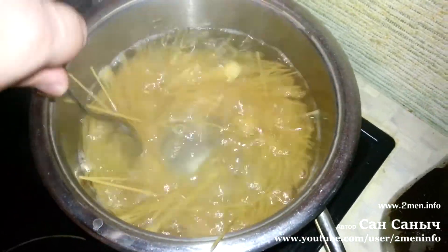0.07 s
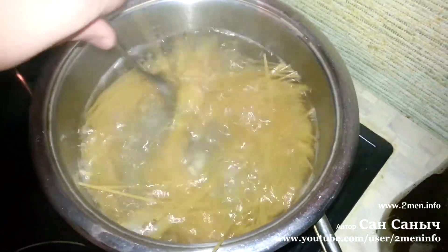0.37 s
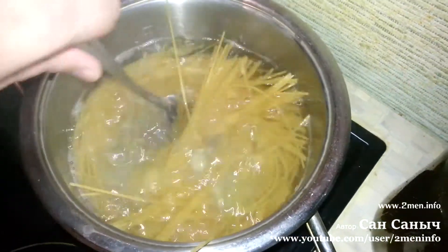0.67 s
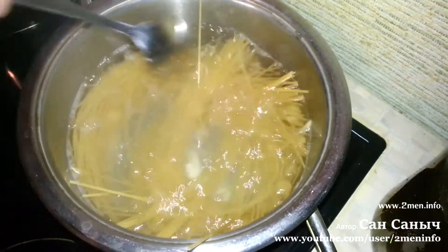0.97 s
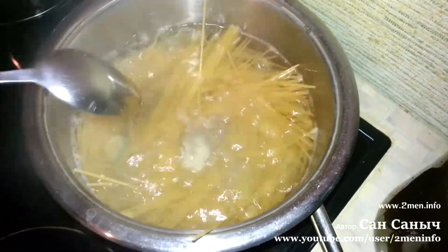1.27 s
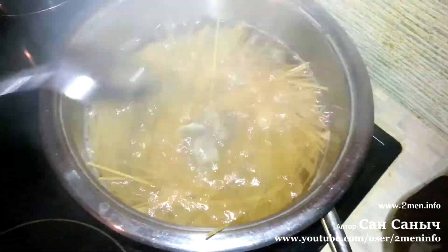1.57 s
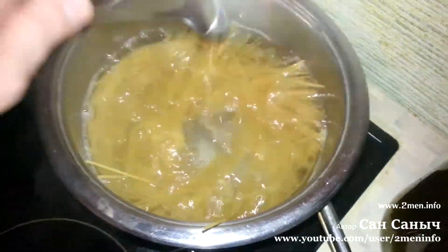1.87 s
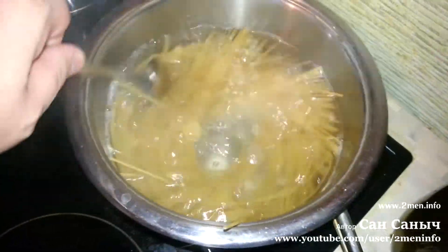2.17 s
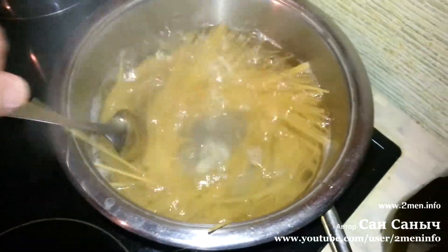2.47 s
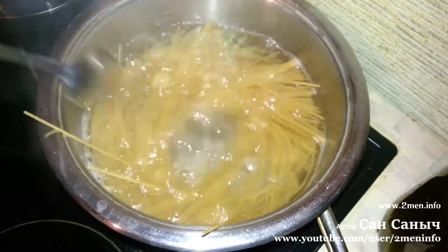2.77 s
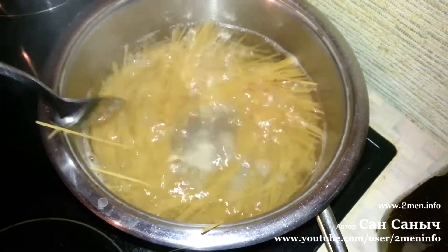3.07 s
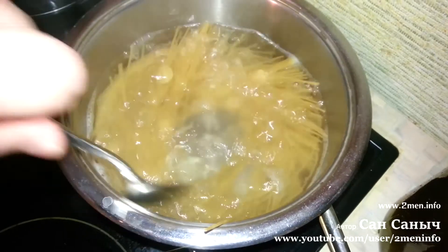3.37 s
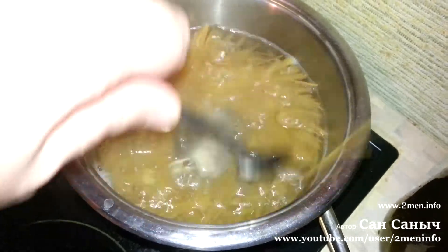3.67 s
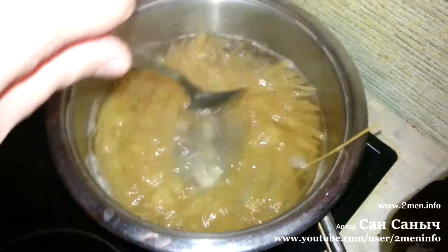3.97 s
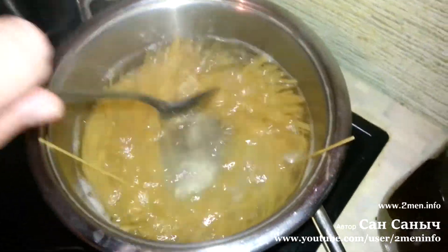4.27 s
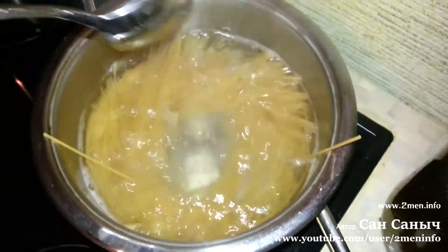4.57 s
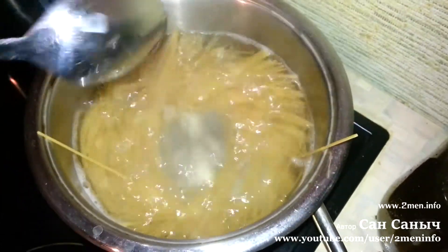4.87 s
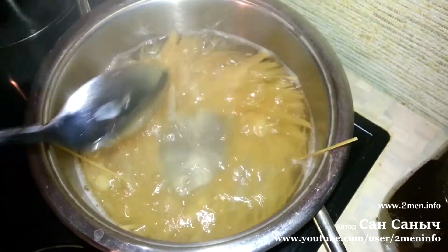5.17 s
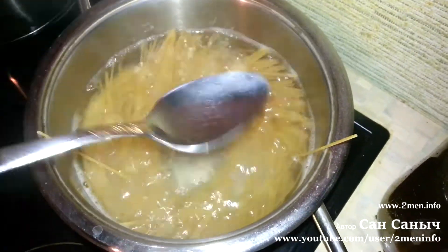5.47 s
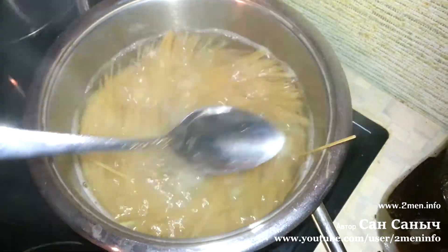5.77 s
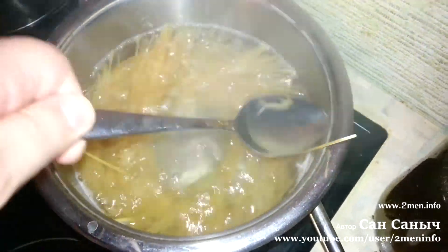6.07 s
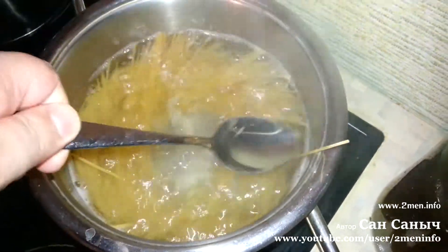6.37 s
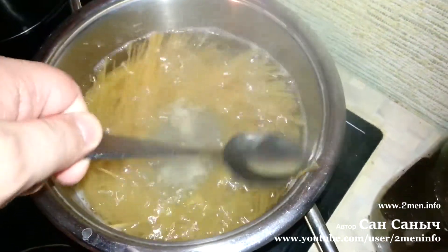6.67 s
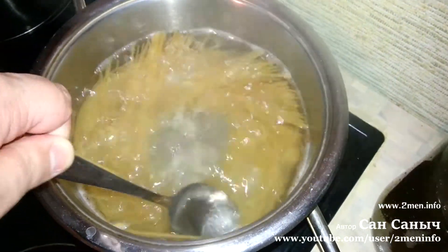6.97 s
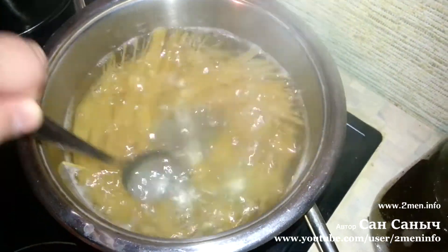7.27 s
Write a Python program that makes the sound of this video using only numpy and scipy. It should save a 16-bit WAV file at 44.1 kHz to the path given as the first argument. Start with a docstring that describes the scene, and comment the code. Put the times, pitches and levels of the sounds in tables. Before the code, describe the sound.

Water bubbles and plops in a steel pot while a metal spoon clinks and briefly scrapes against its side.

```python
"""A small kitchen, close to a steel pot of boiling spaghetti.
Steam bubbles plop and spit, resonating in the hollow of the pot over a low simmer and a fine fizz.
A metal spoon stirs: its knocks ring the wall and the spoon, its scrapes drive resonances by stick-slip.
Two soft bumps sound as the spoon is lowered. Hob, tiles and walls add a short reverberation."""
import sys
import numpy as np
from scipy import signal
from scipy.fft import rfft, irfft
from scipy.io import wavfile
from scipy.ndimage import uniform_filter1d

SR = 44100
rng = np.random.default_rng(int(sys.argv[2]) if len(sys.argv) > 2 else 0)


def inscribe(sig):
    """Save sig as 16-bit PCM at rate SR to the path in sys.argv[1].

    A 1-D sig is mono; a 2-D sig holds one channel per row.
    Samples are clipped to [-1, 1] before scaling.
    """
    pcm = np.round(np.clip(np.atleast_2d(sig).T, -1, 1) * 32767)
    wavfile.write(sys.argv[1], SR, pcm.astype(np.int16))


N = 322371
TIME_S = np.arange(N) / SR
RING_S = np.arange(SR // 2) / SR


# Strength of the boil: time_s, level_db
BOIL_STRENGTH = [(0, -40), (.41, -41), (.83, -45.5), (1.5, -41.5), (2.1, -43.5), (2.9, -43.5),
                 (3.44, -41.5), (3.75, -46), (4.5, -44), (6.7, -45), (7.31, -43)]
# Air modes of the pot: pitch_hz, width_hz, gain_db
POT_AIR_MODES = [(216, 100, -23), (290, 30, -39), (417, 22, -11), (503, 39, -35.5), (728, 17.3, 7),
                 (910, 46, 1.5), (1313, 65, -1)]
# Simmer spectrum: freq_hz, density_db
SIMMER_SPECTRUM = [(18, -35), (45, -43), (70, -24), (110, -6), (160, -8), (205, 4.5), (270, 0), (450, -0.5),
                   (540, -10), (730, -4.5), (1300, -15), (1900, -17.5), (3600, -15.5), (8000, -38.5)]

def boiling(small_db=-3, simmer_db=-2, throb_db=2.5, right_db=0.6, right_lead_s=.00016):
    """Bubbles resonate in the pot over the simmer from its bottom; the right microphone is nearer."""
    strength = amp(np.interp(TIME_S, *np.transpose(BOIL_STRENGTH)))
    pops = burst_events()
    bubbles = large_bubbles(pops) + splashes(pops) + amp(small_db) * strength * small_bubbles()
    hollow = sum(amp(db) * resonate(bubbles, hz, width) for hz, width, db in POT_AIR_MODES)
    simmer = unit(colour(diffuse_noise(N), SIMMER_SPECTRUM))
    simmer *= strength * amp(simmer_db + throb_db * wander(30))
    left, right = bubbles + hollow + simmer
    left = np.interp(TIME_S - right_lead_s, TIME_S, left)
    return np.array([left * amp(-right_db / 2), right * amp(right_db / 2)])


# Loudest bubble bursts: time_s, level_db, pitch_hz
LOUD_BURSTS = [(0.334, -25, 840), (0.362, -24.5, 840), (0.44, -15.5, 974), (0.494, -28, 870),
               (0.526, -25.5, 1150), (0.792, -29.5, 765), (0.906, -30.5, 586), (1.041, -26.5, 1030),
               (1.079, -29.5, 1460), (1.118, -26, 440), (1.232, -29, 320), (1.291, -31, 910),
               (1.332, -21.5, 1090), (1.378, -23, 510), (1.415, -22.5, 990), (1.537, -24.5, 814),
               (1.628, -27.5, 910), (1.655, -23.5, 750), (1.777, -28, 804), (1.941, -28.5, 530),
               (1.965, -21.5, 1110), (2.177, -29.5, 353), (2.221, -26.5, 427), (2.315, -22.5, 960),
               (2.403, -28.5, 338), (2.551, -24.5, 890), (2.64, -24, 1040), (3.164, -18, 1070),
               (3.925, -30.5, 450), (4.121, -29.5, 890), (4.325, -31.5, 1650), (4.463, -21.5, 950),
               (4.487, -23.5, 860), (4.582, -28.5, 870), (4.666, -25.5, 930), (5.156, -28, 820),
               (5.184, -26, 504), (5.565, -31, 830), (5.732, -22, 1170), (6.248, -30, 1470),
               (6.414, -28, 415), (6.628, -14.5, 950), (6.869, -23.5, 820), (7.028, -25, 1010),
               (7.227, -26, 322)]

def burst_events(stray_per_s=6, stray_db=-34.5, stray_hz=960, twin_s=.008, twin_db=-7, count=120):
    """Loud bursts and weak random strays, each followed by a softer, lower twin."""
    moment, twin_wait = rng.random((2, count))
    size, pitch = rng.standard_normal((2, count))
    times_s = np.cumsum(-np.log(1 - moment)) / stray_per_s
    strays = np.c_[times_s, stray_db + 2 * size, stray_hz * 2 ** (.78 * np.clip(pitch, -2, 2))]
    first = LOUD_BURSTS + [row for row in strays if row[0] < N / SR]
    twins = [(s + twin_s * (.5 + wait), db + twin_db, hz * .89)
             for (s, db, hz), wait in zip(first, twin_wait)]
    return first + twins


def plop(hz, swell_cycles, rise=0.068):
    """A bursting bubble: a few cycles that swell, rise slightly in pitch and die."""
    cycles = hz * RING_S[:900]
    age = cycles / swell_cycles
    envelope = (age * np.exp(1 - age)) ** 2
    return envelope * np.sin(2 * np.pi * (cycles * (1 + rise * np.tanh(age - 1)) + rng.random()))


def large_bubbles(pops, swell_cycles=.86, gurgle_db=-15, gurgle_s=0.011, db_per_octave=-7):
    """Each large bubble bursts amid seven weaker ones, which thin out after it."""
    out = np.zeros(N)
    for s, db, hz in pops:
        add(out, s - swell_cycles / hz, amp(db) * plop(hz, swell_cycles))
        for wait, pitch in rng.random((7, 2)):
            delay_s = gurgle_s * (-np.log(1 - .97 * wait) - .55)
            octaves = 2 * pitch - .6
            gain = amp(db + gurgle_db + db_per_octave * max(octaves, 0))
            add(out, s + delay_s, gain * plop(hz * 2 ** octaves, swell_cycles))
    return out


def splashes(pops, gain_db=-12, low_hz=850, high_hz=2600, decay_s=0.00793, db_per_octave=5):
    """The tearing film of each large bubble spits a crackle, louder for high-pitched ones."""
    out, t = np.zeros(N), RING_S[:1500]
    for s, db, hz in pops:
        spit = rng.standard_normal(len(t)) * np.exp(-t / decay_s)
        add(out, s - decay_s / 2, amp(db + gain_db + db_per_octave * np.log2(hz / 1000)) * spit)
    return butterworth(out, 4, [low_hz, high_hz], "band") * np.sqrt(SR / 2 / (high_hz - low_hz))


def small_bubbles(per_s=640, spread_db=4, db_per_octave=-4, surge_db=3.5, pitches=30):
    """A surging crowd of small plops; the high ones are weaker."""
    out = np.zeros(N)
    for hz in np.geomspace(260, 4300, pitches):
        sizes = amp(spread_db * np.minimum(rng.exponential(1, N), 3))
        onsets = rng.random(N) < per_s / pitches / SR
        plops = signal.oaconvolve(sizes * onsets, plop(hz, swell_cycles=.74 + hz / 2500))[:N]
        out += amp(db_per_octave * max(np.log2(hz / 700), 0)) * plops
    return unit(out * amp(surge_db * wander(35)))


# Spoon knocks: start_s, strength_db, clang_lift_db, tick_lift_db, spoon_db, t60_ratio
KNOCKS = [(0.0813, -19.5, 9, -5.5, -45, 0.71), (1.917, -41, -5, -6, -54, 1.9), (2, -44, 0.5, -6, -68, .4),
          (2.274, -29.5, 10, -11, -42, 0.59), (2.291, -31, -20, -5, -59, 0.5),
          (2.8007, -14, 7, -3.5, -19.5, 0.71), (3.032, -14.5, -2.5, -12, -21, 0.55),
          (3.138, -43.5, 1, 1, -40, 3.1), (3.679, -49, -16, -13, -61, 1.2), (4.07, -46, -5, -2, -58, 1.5),
          (6.0142, -15, 1.5, -2, -34, 0.73), (6.238, -42, -3, 1.5, -59, 0.6),
          (6.5386, -17.5, -2.5, -9, -52, 0.89)]
# Thud, clank, clang and tick registers: low_hz, high_hz, weak_base_t60_s, strong_gain_db
KNOCK_REGISTERS = [(188.5, 596, 0.095, 0), (596.6, 2690, 0.08, -6), (2695, 5400, 0.076, -5),
                   (5437, 14000, .075, -7.5)]
# Modes of the spoon's bowl: pitch_hz, relative_db, t60_s
SPOON_MODES = [(7530, -5, 0.16), (7470, -17, 0.15), (9420, -16, 0.071)]

def spoon_knocks(thud_lift_db=-7, weak_db=-4, crack_db=-7.5, crack_base_t60_s=0.049, wall_trim_db=-1):
    """Each knock rings wall and spoon; the wall dies sooner when the spoon stays on it."""
    out = np.zeros((2, N))
    for start_s, strength_db, clang_lift_db, tick_lift_db, spoon_db, t60_ratio in KNOCKS:
        lifts_db = (thud_lift_db, 0, clang_lift_db, tick_lift_db)
        for (low_hz, high_hz, base_t60_s, strong_db), lift_db in zip(KNOCK_REGISTERS, lifts_db):
            wall = amp(weak_db) * weak_modes(low_hz, high_hz, t60_ratio * base_t60_s)
            wall += amp(strong_db) * strong_modes(low_hz, high_hz, t60_ratio)
            wall += amp(crack_db) * crack(low_hz, high_hz, t60_ratio * crack_base_t60_s)
            add(out, start_s, amp(strength_db + lift_db + wall_trim_db) * wall)
        add(out, start_s, amp(spoon_db) * unit_attack(ring(SPOON_MODES, apart_hz=40000)))
    pot_bottom = ring([(200.4, -18.5, .17)])  # shaken by the first knock
    add(out, KNOCKS[0][0], pot_bottom)
    return butterworth(out, 2, 165, "high")  # the knocks carry little deep bass


# Water-damped wall modes: pitch_hz, relative_db, base_t60_s
WALL_MODES = [(198, -8, .13), (365, -3, .09), (412, -1, .1), (471, 3, .17), (775, -5, .2), (915, -6, .18),
              (990, -5, .16), (1351, 1, .19), (1762, 0, .2), (2034, -3, .18), (2365, -4, .17),
              (2574, -4, .16), (2835, -4, .15), (2963, 4, .18), (3135, -2, .15), (3638, -3, .16),
              (4050, -4, .15), (4420, -5, .17), (5060, -8, .1), (6020, -4, .09), (9615, 0, .1),
              (11092, -3, .12), (13750, -11, .1)]

def strong_modes(low_hz, high_hz, t60_ratio, detune=0.0043, spread_db=1):
    """The wall's strong modes ring in close pairs, detuned by the touch."""
    modes = [(hz * (1 + detune * rng.standard_normal()),
              db + spread_db * rng.standard_normal(), t60_ratio * t60_s)
             for hz, db, t60_s in WALL_MODES + WALL_MODES if low_hz <= hz < high_hz]
    return unit_attack(ring(modes))


# Spectrum of the weak wall modes: freq_hz, relative_db
WEAK_MODE_SPECTRUM = [(170, -23.5), (400, -22.5), (650, -7), (1000, 16.5), (2400, 15), (3100, 9),
                      (4400, 0.5), (5600, -15), (7500, 2.5), (10500, -9), (14000, -35)]

def weak_modes(low_hz, high_hz, mean_t60_s, count=45):
    """A crowd of weak wall modes scattered over one register."""
    place, life = rng.random((2, count))
    hz = low_hz + (high_hz - low_hz) * (np.arange(count) + place) / count
    return unit_attack(ring(np.c_[hz, curve_at(WEAK_MODE_SPECTRUM, hz), mean_t60_s * (.5 + life)]))


def crack(low_hz, high_hz, t60_s):
    """The brief shock of contact in one register."""
    burst = diffuse_noise(len(RING_S)) * amp(-60 * RING_S / t60_s)
    return unit_attack(butterworth(burst, 5, [low_hz, high_hz], "band"))


# Spoon strokes: start_s, length_s, friction_db, drift_db_per_s, push_s, push_db, first_hz, second_hz,
# first_lift_db, second_lift_db, slide_per_s, waver_ratio, flare_db, grit_db, bowl_db
STROKES = [(0.139, 0.43, -32, -37.5, .265, 6, 2990, 1830, 19, 5.5, -0.1, 0.0087, 5, -13, -40),
           (3.121, 0.41, -33.5, -14, 3.25, 4.5, 2560, 1830, 5, 6.5, -.11, 0.014, 5, 2, -11),
           (6.573, 0.15, -31.5, 15, 6.714, 1.5, 950, 2600, 7, 2, 0.095, .012, 8.5, 2, -40)]
# Spoon and wall pressed together: pitch_hz, width_hz, relative_db
CONTACT_MODES = [(484, 93, -4), (922, 140, -4), (1120, 450, -3), (1828, 82, -4), (2616, 117, -5),
                 (2920, 190, -7), (3470, 110, 0.5), (3840, 230, -5.5), (4600, 210, -19), (6000, 70, -20),
                 (7000, 630, -13.5), (10230, 410, -17.5)]
# Friction spectrum: freq_hz, density_db
GRIT_SPECTRUM = [(60, -40), (200, -15), (500, -8), (1400, 6.5), (2300, 5), (3700, 1), (5000, -2.5),
                 (6200, -10), (7500, -9), (9000, -8), (10500, -11), (14000, -20)]

def spoon_scrapes(trim_db=1, chatter_db=2, push_share=.11, lift_off_s=.07, lift_off_db_per_s=600):
    """Stick-slip drives resonances that slide, waver and flare as the spoon travels along the wall."""
    out = np.zeros((2, N))
    for (start_s, length_s, friction_db, drift_db_per_s, push_s, push_db, first_hz, second_hz,
         first_lift_db, second_lift_db, slide_per_s, waver_ratio, flare_db, grit_db, bowl_db) in STROKES:
        span = slice(int(start_s * SR), int((start_s + length_s + lift_off_s) * SR))
        t = TIME_S[span] - start_s
        slips = diffuse_noise(N) * amp(chatter_db * wander(120))  # the grip catches and lets go
        slide = 1 + slide_per_s * (t - t.mean())
        squeal = 0
        for hz, width_hz, mode_db in CONTACT_MODES:
            lift_db = first_lift_db * (abs(hz / first_hz - 1) < .06)
            lift_db += second_lift_db * (abs(hz / second_hz - 1) < .06)
            path_hz = hz * slide * (1 + waver_ratio * wander(22)[span])
            voice = resonate(resonate(slips[:, span], path_hz, width_hz), path_hz, width_hz)
            squeal += amp(mode_db + lift_db) * unit(voice * amp(flare_db * wander(28)[span]))
        rasp = unit(squeal) + amp(grit_db) * unit(colour(slips, GRIT_SPECTRUM)[:, span])
        bowl = resonate(slips[:, span], SPOON_MODES[0][0], width_hz=70)
        rasp += amp(bowl_db) * unit(bowl * amp(flare_db * wander(27.95)[span]))
        rasp /= np.sqrt(uniform_filter1d((rasp ** 2).mean(0), size=2000))  # modes share the power
        push = np.exp(-((TIME_S[span] - push_s) / (push_share * length_s)) ** 2)
        fall_db = lift_off_db_per_s * np.maximum(t - length_s, 0)
        level_db = trim_db + friction_db + drift_db_per_s * t + push_db * push - fall_db
        add(out, start_s, rasp * amp(level_db))
    return out


# Fizz spectrum: freq_hz, density_db
FIZZ_SPECTRUM = [(500, -31), (1800, -15), (3300, -10), (4400, 0), (6100, -5), (7500, -1), (10000, -0.5),
                 (14000, -3.5)]

def fizz(level_db=-57, prickle_db=-10, per_s=150):
    """Fine hiss with the prickle of tiny bursting films."""
    prickle = (rng.random(N) < per_s / SR) * rng.standard_normal((2, N))
    hiss = rng.standard_normal((2, N)) + amp(prickle_db) * unit(prickle)
    return amp(level_db + .5 * wander(3.09)) * unit(colour(hiss, FIZZ_SPECTRUM))


# Handling bumps: centre_s, level_db, pitch_hz, half_length_s
BUMPS = [(1.997, -43, 118, 0.046), (2.089, -43, 110.3, .11)]

def bumps():
    """Soft, low bumps while the spoon is lowered."""
    out = np.zeros(N)
    for centre_s, db, hz, half_length_s in BUMPS:
        t = np.arange(0, half_length_s * 2, 1 / SR)
        envelope = amp(db) * np.hanning(len(t)) ** 2
        add(out, centre_s - half_length_s, envelope * np.sin(2 * np.pi * hz * t))
    return out


# Room decay: freq_hz, t60_s
KITCHEN_DECAY = [(150, 0.5), (600, 0.49), (3000, 0.42), (7000, 0.32), (14000, 0.28)]

def kitchen(x, gap_s=0.0013, build_s=0.014):
    """Dense reflections from hob, tiles and walls; treble dies first."""
    size = len(RING_S)
    taps = diffuse(rng.standard_normal((2, size)) * (rng.random((2, size)) < .1))
    hz, t, bands = signal.stft(taps, SR, nperseg=256)
    decay = amp(-60 * t / curve_at(KITCHEN_DECAY, hz)[:, None])
    tail = signal.istft(bands * decay, SR, nperseg=256)[1][:, :size]
    tail *= np.clip((RING_S - gap_s) / build_s, 0, 1)
    return signal.fftconvolve(x, tail / np.linalg.norm(tail[0]), axes=1)[:, :N]


# Left-right likeness of the field: freq_hz, correlation
FIELD_CORRELATION = [(60, 0.25), (130, 0.93), (290, 1), (640, 0.67), (1400, 0.18), (3000, 0.015)]

def diffuse(pair):
    """Two unrelated signals become a diffuse field at two microphones, alike in the bass only."""
    size = pair.shape[-1]
    left, other = rfft(pair)
    alike = curve_at(FIELD_CORRELATION, np.fft.rfftfreq(size, 1 / SR))
    return irfft(np.array([left, alike * left + np.sqrt(1 - alike ** 2) * other]), size)


def diffuse_noise(size):
    return diffuse(rng.standard_normal((2, size)))


def ring(modes, apart_hz=2200):
    """Dying sines; the left-right phase difference grows with pitch up to apart_hz."""
    hz, db, t60_s = np.transpose(modes)[:, :, None]
    start, skew = rng.uniform(-np.pi, np.pi, (len(hz), 2)).T[:, :, None]
    t = RING_S[:int(min(t60_s.max(), .5) * SR)]
    fade = amp(db - 60 * t / t60_s)
    phase = 2 * np.pi * hz * t + start
    skew = skew * np.minimum(hz / apart_hz, 1)
    out = np.zeros((2, len(RING_S)))
    add(out, 0, np.array([(fade * np.sin(phase + side * skew)).sum(0) for side in (-.5, .5)]))
    return out


def resonate(x, hz, width_hz):
    """Unity-gain resonance that can follow a moving frequency."""
    carrier = np.exp(2j * np.pi * np.cumsum(hz * np.ones(x.shape[-1])) / SR)
    pole = np.exp(-np.pi * width_hz / SR)
    return 2 * (carrier * signal.lfilter([1 - pole], [1, -pole], x / carrier + 1e-18)).real


def wander(knots_per_s):
    """Random drift of rms 1."""
    knots = rng.standard_normal(1600)
    return unit(np.interp(TIME_S * knots_per_s, np.arange(len(knots)), knots))


def curve_at(points, hz):
    """Interpolates on a log-frequency axis."""
    knots_hz, values = np.transpose(points)
    return np.interp(np.log(hz + 1), np.log(knots_hz + 1), values)


def colour(x, spectrum):
    """Filters by a dB spectrum."""
    return irfft(rfft(x) * amp(curve_at(spectrum, np.fft.rfftfreq(N, 1 / SR))), N)


def pan_bands(pair, balance):
    """Tilts a stereo sound left or right, band by band."""
    return np.array([colour(x, [(hz, side * db) for hz, db in balance])
                     for x, side in zip(pair, (.5, -.5))])


def butterworth(x, order, edges_hz, kind):
    return signal.sosfilt(signal.butter(order, edges_hz, kind, fs=SR, output="sos"), x)


def amp(db):
    return 10 ** (np.asarray(db) / 20)


def unit(x):
    return x / np.sqrt(np.mean(x ** 2) + 1e-20)


def unit_attack(x):
    """Scales to rms 1 over the first 25 ms."""
    return x / np.sqrt(np.mean(x[:, :1100] ** 2) + 1e-20)


def add(mix, start_s, sound):
    part = mix[..., max(round(start_s * SR), 0):][..., :sound.shape[-1]]
    part += sound[..., :part.shape[-1]]


# Leftward lean of the wall's treble: freq_hz, left_minus_right_db
SPOON_BALANCE = [(7500, 1), (9500, 6.5), (11500, 7.5)]

def scene(spoon_room_db=-8, water_room_db=-9):
    """Spoon and water in the kitchen."""
    spoon = pan_bands(spoon_knocks() + spoon_scrapes(), SPOON_BALANCE)
    water = boiling()
    room = kitchen(amp(spoon_room_db) * spoon + amp(water_room_db) * water)
    return spoon + water + room + fizz() + bumps()


# Microphone mismatch: freq_hz, left_minus_right_db
MIC_BALANCE = [(180, -1.5), (400, 0.5), (900, -4), (1900, 0), (3600, 2), (6500, -2), (12500, -2.5)]

def record(dry, low_cut_hz=55, high_cut_hz=14650):
    """Two small, unlike microphones shed deep bass; clipping at full scale, then a band limit."""
    pair = pan_bands(butterworth(dry, 2, low_cut_hz, "high"), MIC_BALANCE)
    low_pass = signal.firwin(301, high_cut_hz, window=("kaiser", 8), fs=SR)
    return signal.oaconvolve(np.clip(pair, -1, 1), low_pass[None], "same")


dry = scene()
out = record(dry)
inscribe(out)
```